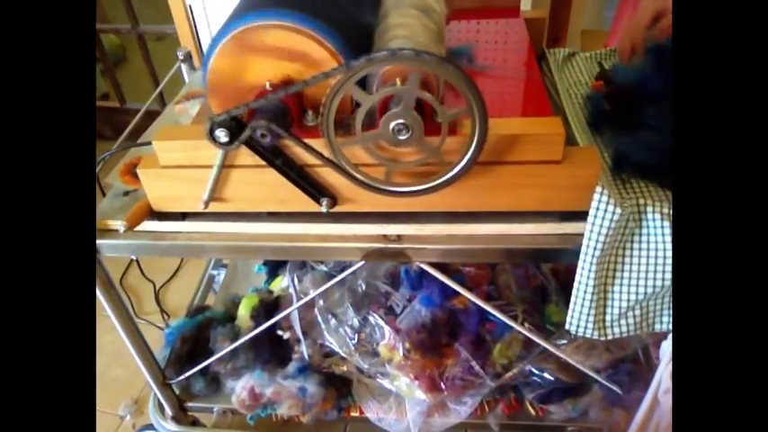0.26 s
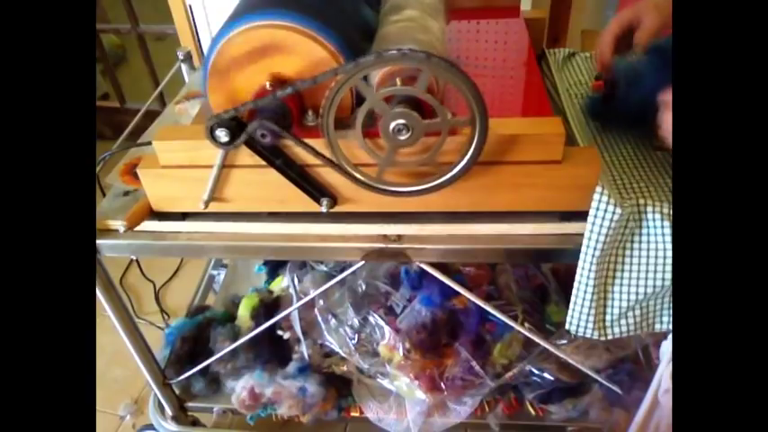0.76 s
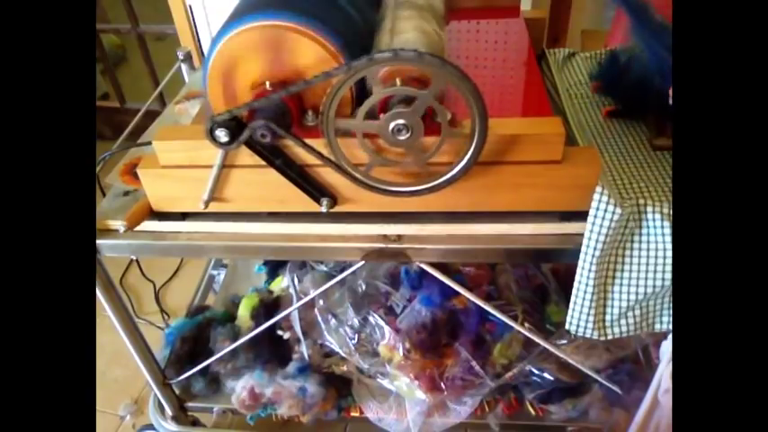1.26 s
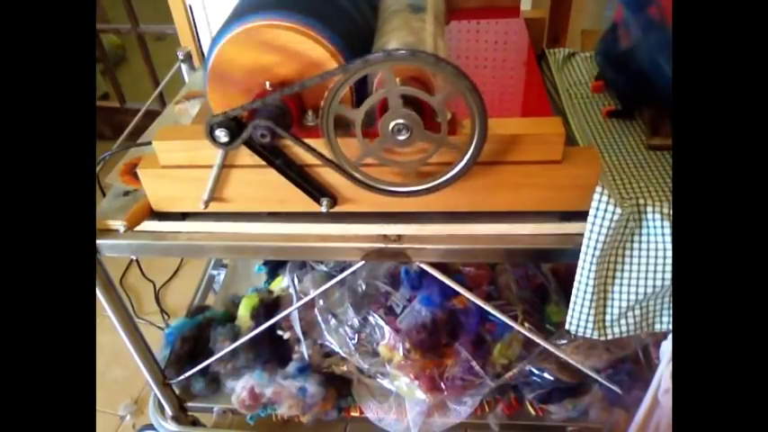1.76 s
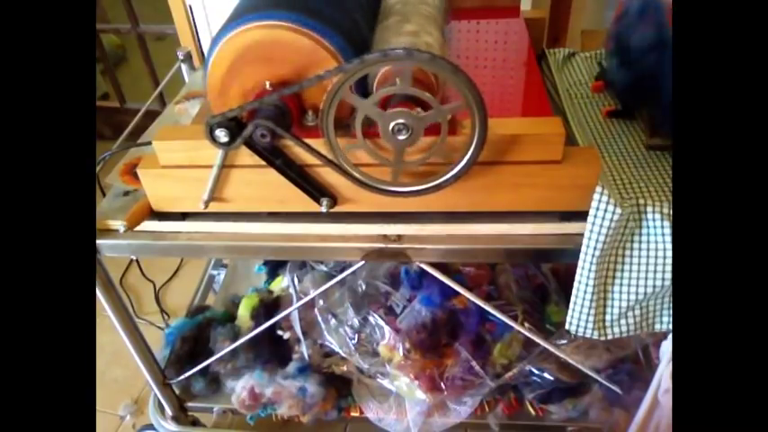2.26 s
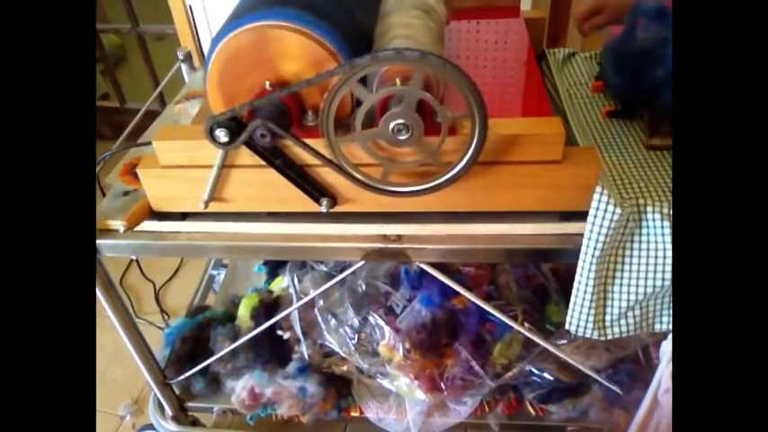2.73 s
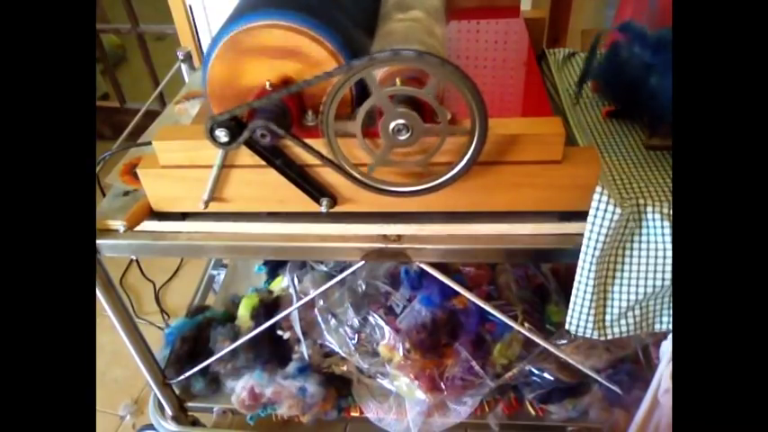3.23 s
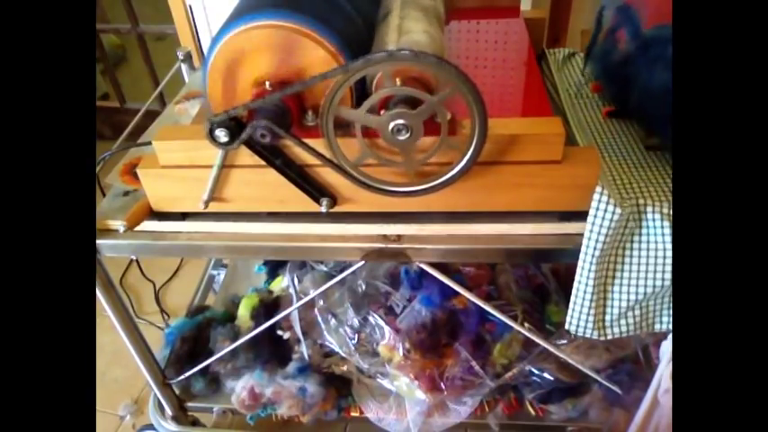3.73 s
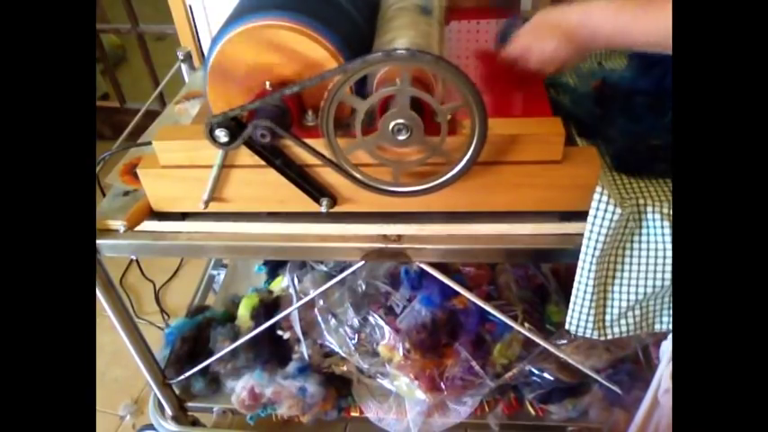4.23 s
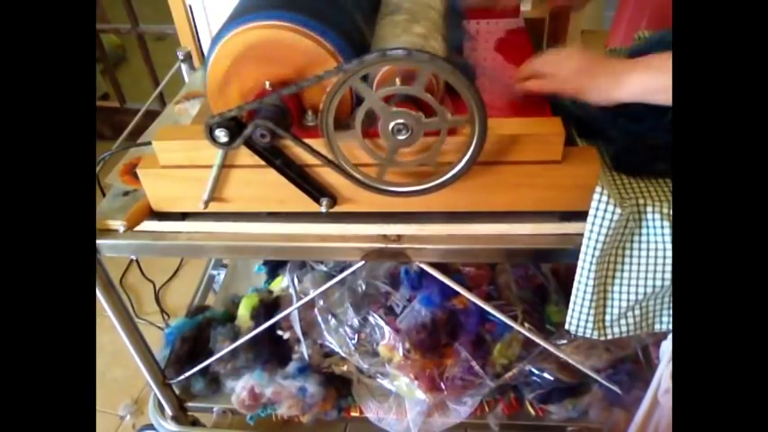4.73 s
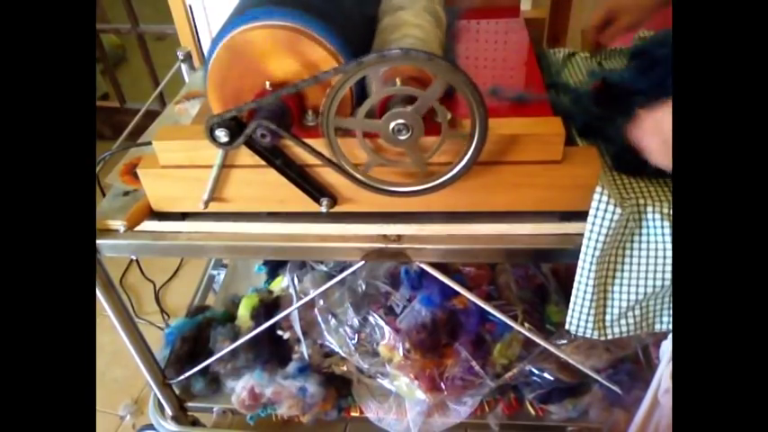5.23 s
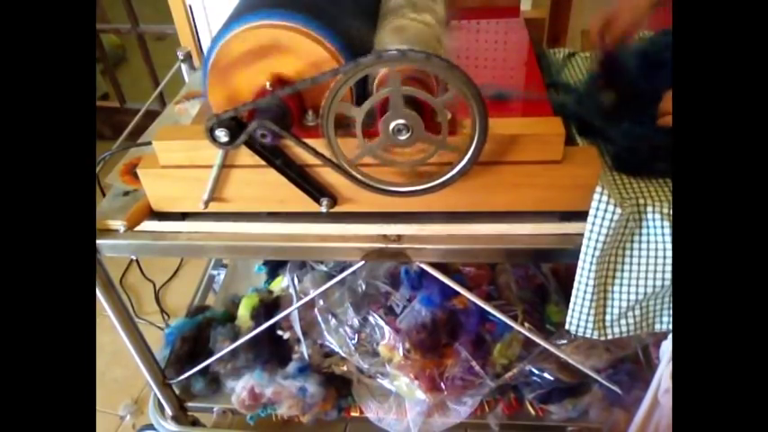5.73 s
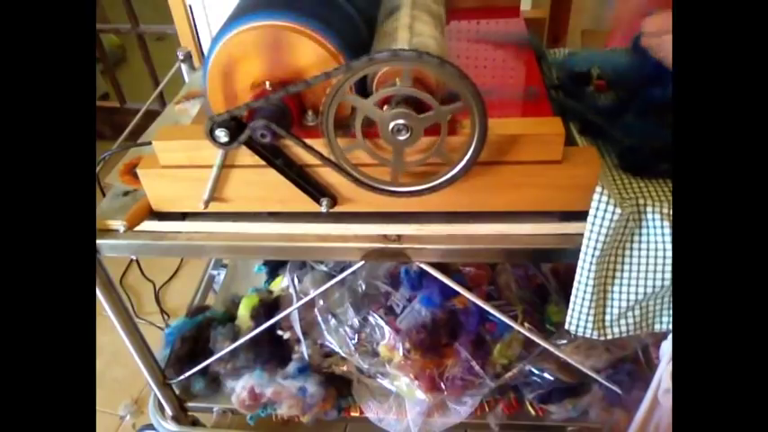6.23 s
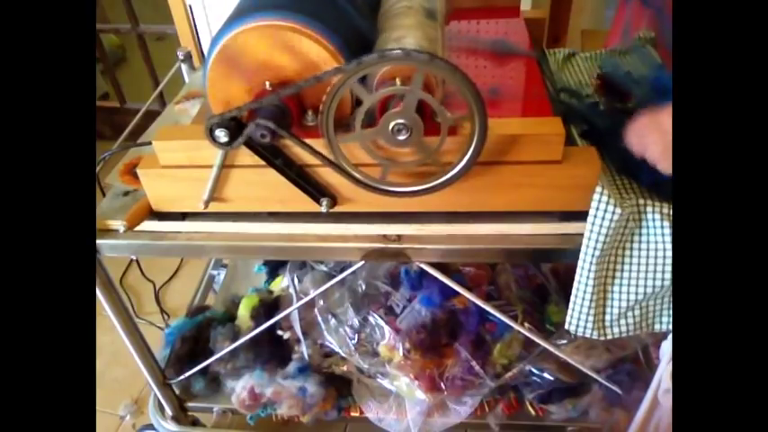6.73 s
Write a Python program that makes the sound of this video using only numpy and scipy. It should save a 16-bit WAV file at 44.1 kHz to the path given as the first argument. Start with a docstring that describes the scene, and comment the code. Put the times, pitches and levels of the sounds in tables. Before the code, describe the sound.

Close up, a motorized wool carder runs with quick chain clicking and knocking, a low hum, and rasping, snapping fibres.

```python
"""An electric drum carder on a table in a small room, one microphone close by.
From the start its induction motor hums, the wooden frame shakes and wool scrapes into the wire teeth;
a thick tuft snaps through with a clunk. After a second the drum runs freer: the chain clicks and knocks
over the sprockets, two high teeth tick on each turn and small knots snap. Near 5.7 s a hand pulls a
lock apart; then the drum slows as more wool is drawn in, and tufts clunk through again."""
import sys
import numpy as np
from scipy import signal
from scipy.fft import rfft, irfft
from scipy.io import wavfile

SR = 44100
rng = np.random.default_rng(int(sys.argv[2]) if len(sys.argv) > 2 else 0)


def store_pcm(level_fs):
    """Save levels as 16-bit WAV."""
    pcm = np.round(np.clip(level_fs, -1, 1) * 32767).astype(np.int16)
    wavfile.write(sys.argv[1], SR, np.atleast_2d(pcm).T)


N = 307818
TIME = np.arange(N) / SR
TURN_LINKS, LAP_LINKS = 8, 10  # links to a drum turn, and from one firm knock to the next
SEAT_LINK = 0.68  # how far into its step a link seats

# chain speed, which sags while wool is drawn in: (time [s], speed [links/s])
CHAIN_SPEED = [(0, 17.188), (0.55, 17.229), (1.0, 19.044), (1.4, 18.995), (2.1, 19.421), (5.95, 19.399),
               (6.2, 17.994), (6.75, 18.249), (6.98, 18.227)]
# resonances of the wooden frame: (frequency [Hz], width [Hz], gain [dB])
FRAME_MODES = [(174.7, 3.2, -9), (200.6, 7, -0.5), (242.4, 9, 4), (262.4, 5.9, 5.5), (264, 5.6, 1.5),
               (315.5, 20, -10), (352.7, 17, 7), (388.7, 8.7, 7.5), (399, 20, -2.5), (433, 14, -22)]
# spectra of rubbing wool, fine fibre hiss and a tuft's clunk: (frequency [Hz], level [dB])
RUB_SPECTRUM = [(80, -48), (300, -33), (700, 0), (950, 1.5), (1400, 3.5), (1850, 3.5), (2050, 1),
                (2350, -2.5), (2900, -11), (4200, -13), (6000, -19.5), (15000, -25)]
HISS_SPECTRUM = [(500, -50), (3000, 6), (5000, 4.5), (9000, 3), (12000, 0.5), (15500, -12)]
CLUNK_SPECTRUM = [(50, -53), (110, -18.5), (180, -2), (330, 0), (550, 7), (700, 5.5), (850, 3.5),
                  (1200, -9), (1850, -5.5), (2700, -17.5), (4500, -25.5), (8000, -42), (15000, -50)]


def amp(db):
    """Decibels to gain."""
    return 10 ** (np.asarray(db) / 20)


def unit(x):
    """Scales to an rms of 1."""
    return x / np.sqrt(np.mean(x ** 2) + 1e-20)


def curve(points):
    """Joins (time, value) points with straight lines, sample by sample."""
    return np.interp(TIME, *np.transpose(points))


def add(mix, s, sound):
    """Mixes a sound in at time s."""
    part = mix[max(round(s * SR), 0):][:len(sound)]
    part += sound[:len(part)]


def colour(x, spectrum, tilt_db=0):
    """Minimum-phase filter of unit energy; the spectrum tilts by tilt_db an octave about 1 kHz."""
    hz = np.fft.rfftfreq(4096, 1 / SR) + 1
    corner_hz, db = np.transpose(spectrum)
    octaves = np.log2(np.clip(hz, 200, 6000) / 1000)
    gain = amp(np.interp(np.log(hz), np.log(corner_hz), db) + tilt_db * octaves)
    cepstrum = irfft(np.log(gain + 1e-6))
    cepstrum[1:2048] *= 2  # folding the cepstrum makes the filter causal
    cepstrum[2049:] = 0
    taps = irfft(np.exp(rfft(cepstrum)))
    return signal.fftconvolve(x, taps / np.linalg.norm(taps))[:len(x)]


def drift(rate_hz):
    """Slow random motion of rms 1."""
    hz = np.fft.rfftfreq(N, 1 / SR)
    return unit(irfft(rfft(rng.standard_normal(N)) * np.exp(-(hz / rate_hz) ** 2), N))


def grains(per_s, spread_db):
    """Random tiny clicks, a few much larger than the rest."""
    size = amp(spread_db * np.minimum(rng.exponential(1, N), 4))
    return unit(size * rng.choice([-1, 1], N) * (rng.random(N) < per_s / SR))


def blow(t60, tail_db, tail_t60, tap):
    """A sharp tap, a short burst of contact noise and its weaker ring in the room."""
    t = TIME[:SR // 3]
    burst = rng.standard_normal(len(t)) * (amp(-60 * t / t60) + amp(tail_db - 60 * t / tail_t60))
    burst[0] += tap
    return burst


def resonate(x, modes):
    """Rings damped modes with x; the narrower a mode, the longer it lasts."""
    t = TIME[:SR // 2]
    response = sum(amp(db) * 2 * np.pi * width / SR * np.exp(-np.pi * width * t)
                   * np.cos(2 * np.pi * hz * t) for hz, width, db in modes)
    return signal.fftconvolve(x, response)[:N]


def link_phase(start_link=-0.976):
    """Running count of the chain links that have passed."""
    return start_link + np.cumsum(curve(CHAIN_SPEED)) / SR


def passes(first, every):
    """Times at which a given link comes round, again and again."""
    phase = link_phase()
    return np.interp(np.arange(first, phase[-1], every), phase, TIME)


def sag():
    """Fraction of its top speed that the chain loses to the load."""
    speed = curve(CHAIN_SPEED)
    return 1 - speed / speed.max()


def ducking(db_per_percent=0.4, limit_db=3):
    """Background ducking: hum, rumble, link clicks and rub dip a little in the slow, loud passages."""
    return amp(-np.minimum(db_per_percent * 100 * sag(), limit_db))


def motor(mains_hz=60.01, shaft_hz=28.86, sag_share=0.25, hum_waver=0.12, rotor_waver=0.49):
    """Magnetic hum at even multiples of the mains, with less steady tones from the loaded rotor."""
    # motor tones: (multiple of the mains, multiple of the shaft rate), and for each (level [dB])
    orders = [(2, 0), (4, 0), (6, 0), (8, 0), (10, 0), (12, 0), (2, 1), (2, 3), (4, 1), (6, 1), (0, 5),
              (0, 6), (0, 9), (0, 10), (0, 11)]
    levels = [-70.5, -49.5, -55.5, -80, -52.5, -73.5, -72, -62.5, -60, -59, -73, -65, -84, -62.5, -60]
    shaft_turns = shaft_hz * np.cumsum(1 - sag_share * sag() + 0.001638 * drift(4.5)) / SR
    out = np.zeros(N)
    for (mains, shaft), db in zip(orders, levels):
        cycles = mains * mains_hz * TIME + shaft * shaft_turns + rng.random()
        waver = 1 + (rotor_waver if shaft else hum_waver) * drift(7.3)
        out += amp(db) * np.sqrt(2) * np.sin(2 * np.pi * cycles) * waver
    return out


def frame():
    """The gears shake the wooden frame at its resonances, over a low rumble."""
    # rumble of the machine: (frequency [Hz], level [dB])
    rumble_spectrum = [(20, -51), (70, -17), (100, -10.5), (150, -6), (190, -18), (230, 3), (310, 1),
                       (430, -6.5), (600, 14), (680, -1), (900, -16.5), (1500, -12), (4000, -20.5)]
    shaken = resonate(grains(4000, 1.0), FRAME_MODES)
    shaken = signal.sosfilt(signal.butter(4, 150, "high", fs=SR, output="sos"), shaken)
    return amp(-49) * unit(shaken) + amp(-56) * colour(grains(4000, 4.7), rumble_spectrum)


def body(contact, gain_db=-2):
    """Whatever touches the drums reaches the microphone directly and through the machine's modes."""
    # drum, sprocket and side boards: (frequency [Hz], width [Hz], gain over the direct sound [dB])
    modes = [(470, 310, -11.5), (959, 48, 0.5), (1064, 15.5, 3.5), (1190, 38, 1), (1376, 15, 1.5),
             (1530, 16, 0), (1520, 7, -4), (1797, 23, 1.5), (2275, 28, 4), (2508, 50, -2.5), (2727, 32, 1),
             (3477, 20, 3)]
    return amp(gain_db) * (contact + resonate(contact, modes))


def drums(surge_db=3, settle_links=0.19, scratch_db=0.9):
    """Fibres rub through the teeth, surging as each link jerks the drum on, under a scratchy hiss."""
    # rubbing of the drums, and the fine hiss above it: (time [s], level [dB])
    rub_levels = [(1.1, -48.5), (1.5, -47), (1.95, -52.5), (2.9, -53), (3.4, -52), (4.45, -52),
                  (5.4, -52.5), (5.9, -50.5), (6.98, -50)]
    hiss_levels = [(0.9, -63), (1.15, -55.5), (1.35, -61.5), (1.7, -58.5), (2.0, -66.5), (2.55, -65.5),
                   (2.95, -67), (3.35, -65), (3.62, -71), (3.8, -62), (4.2, -61.5), (4.45, -78),
                   (4.62, -61), (4.9, -67.5), (5.4, -68.5), (5.9, -62.5), (6.6, -59), (6.98, -67)]
    jerk = np.exp(-((link_phase() - SEAT_LINK) % 1) / settle_links)
    fibres = (grains(2500, 2.0) + amp(-3) * grains(170, 2.3)) * amp(1.4 * drift(62))
    rub = amp(curve(rub_levels) - 2.5 + surge_db * jerk) * colour(fibres, RUB_SPECTRUM)
    hiss = amp(curve(hiss_levels) + scratch_db * drift(30)) * colour(grains(15000, 1.5), HISS_SPECTRUM)
    return rub + hiss


def catches(uneven_db=2):
    """Thick patches of wool catch between the drums and rasp for a moment on every turn."""
    # wool on the drum: (place in the turn [links], level [dB], length [links])
    patches = [(2.1, -52, 0.65), (6.2, -54.5, 0.9), (7.15, -49, 0.88)]
    phase, level = link_phase(), np.zeros(N)
    for link, db, length in patches:
        links_away = (phase - link + TURN_LINKS / 2) % TURN_LINKS - TURN_LINKS / 2
        level += amp(db) * np.exp(-(2 * links_away / length) ** 2)
    return level * amp(uneven_db * drift(9.2)) * colour(grains(2500, 1.1), RUB_SPECTRUM)


def rustle():
    """A lock is pulled apart by hand and ends with a small snap."""
    # parting fibres: (frequency [Hz], level [dB])
    spectrum = [(200, -44), (2800, -37), (4200, 14.5), (5200, 11), (5900, 4), (7200, 9.5), (8500, -14),
                (14000, -28)]
    level_db = curve([(5.68, -81), (5.735, -49), (5.774, -54), (5.777, -46), (5.783, -55), (5.81, -75)])
    return amp(level_db) * colour(grains(5500, 4.8), spectrum)


def links(spread_db=3, jingle_hz=3520, jingle_db=-24, jingle_t60=0.09):
    """Each link clicks as it seats and its roller jingles; a few seat hard, with a dry snap."""
    # click of a link: (frequency [Hz], level [dB])
    spectrum = [(200, -20), (500, -32), (1000, 11.5), (1900, 8.5), (2800, 1.5), (3500, 6.5), (4300, -4),
                (6000, -19), (14000, -24)]
    # click on each of the sprocket's eight teeth: (level [dB])
    tooth_db = [-48.5, -54.5, -52, -51.5, -55, -52, -46.5, -51]
    # links that seat hard: (time [s], level [dB], tilt [dB/octave])
    hard_links = [(1.103, -42, 1), (1.2106, -45, 5), (1.7368, -54, -2), (2.097, -55, -6), (2.1513, -49, -1),
                  (2.3553, -48.5, 1.5), (2.526, -42, -1), (2.714, -48, 4), (2.768, -55, 2),
                  (2.869, -47, -1.5), (3.1775, -42, -1.5), (3.2314, -54, 11), (3.6974, -46.5, 4.5),
                  (3.747, -46, 6), (4.624, -47, 3), (4.692, -51, -3), (4.778, -47, 4), (4.832, -46, -4.5),
                  (5.239, -44, 3), (5.342, -47.5, 4), (5.7004, -55, 2), (5.754, -46, 5), (6.290, -44, -1)]
    out, t = np.zeros(N), TIME[:SR // 3]
    for k, s in enumerate(passes(SEAT_LINK, 1)):
        db = tooth_db[k % TURN_LINKS] + spread_db * rng.standard_normal()
        add(out, s, amp(db) * colour(blow(0.04, -26, 0.1, tap=3.4), spectrum))
        roller_hz = jingle_hz * (1 + 0.048 * rng.standard_normal(size=3))
        jingle = sum(np.sin(2 * np.pi * hz * t) for hz in roller_hz)
        add(out, s, amp(db + jingle_db - 60 * t / jingle_t60) * jingle)
    for s, db, tilt_db in hard_links:
        add(out, s, amp(db) * colour(blow(0.051, -21, 0.13, tap=7), spectrum, tilt_db))
    return out


def knock(db, tilt_db, bounce_s=0.0098, bounce_db=-9):
    """A slack link clacks against the sprocket and bounces once."""
    # the clack: (frequency [Hz], level [dB])
    spectrum = [(120, -31), (300, 0.5), (520, 6.5), (720, -0.5), (960, -1), (1250, -1.5), (1800, -6),
                (2700, -16.5), (5000, -32), (14000, -45)]
    strike = blow(0.04, -10, 0.12, tap=7.5)
    add(strike, bounce_s * (0.5 + rng.random()), amp(bounce_db) * blow(0.025, -9, 0.066, tap=11))
    return amp(db - 9) * colour(strike, spectrum, tilt_db)


def hollow(db, lowest_hz=380, pitch_spread=0.013, spread_db=1):
    """The sprocket and its small board answer a knock with a hollow ring, never quite the same."""
    # their modes: (frequency [Hz], level [dB], t60 [s])
    modes = [(491, -19, 0.27), (534, -22, 0.32), (910, -17, 0.04), (969, -11, 0.078), (1060, -35, 0.027),
             (1790, -19, 0.06)]
    tock, t = np.zeros(SR // 3), TIME[:SR // 3]
    for hz, mode_db, t60 in modes:
        decay = amp(db + mode_db + spread_db * rng.standard_normal() - 60 * t / t60)
        tock += decay * np.sin(2 * np.pi * hz * (1 + pitch_spread * rng.standard_normal()) * t)
    return signal.sosfilt(signal.butter(3, lowest_hz, "high", fs=SR, output="sos"), tock)


def tocks():
    """Light knocks ring mainly the upper modes of the big sprocket: a short pitched tock."""
    # light knocks: (time [s], level [dB])
    strikes = [(1.997, -33), (2.940, -31), (3.13, -33), (3.178, -42), (3.593, -40), (3.642, -35.5),
               (4.005, -43), (4.418, -36), (4.508, -33), (4.778, -35), (5.186, -34), (5.648, -36)]
    out = np.zeros(N)
    for s, db in strikes:
        add(out, s, knock(db - 5, tilt_db=-1) + hollow(db, lowest_hz=800))
    return out


def chain(spread_db=2):
    """The chain knocks firmly each lap and clacks brightly each drum turn, among rattles and slaps."""
    # knock of each lap, and clack of each turn: (level [dB])
    lap_db = [-31.5, -37, -30.5, -30.5, -30.5, -33.5, -33.5, -30, -30.5, -31.5, -32, -29, -30, -34]
    turn_db = [-50.5, -40, -46, -36, -40, -37, -39, -30, -36, -40, -36, -31, -47, -33.5, -44, -48]
    # lighter recurring knocks: (period [links], first [link], level [dB], tilt [dB/octave])
    rattles = [(LAP_LINKS, 6.2, -46, -0.92), (LAP_LINKS, 8.4, -40, -4.3), (LAP_LINKS, 4.9, -37.5, -2),
               (TURN_LINKS, 2.66, -43, 3.1)]
    # stray slaps of a slack link: (time [s], level [dB], tilt [dB/octave])
    slaps = [(1.632, -47, 3), (1.854, -36.5, 3.5), (2.407, -40, 4), (2.508, -37, 3), (2.920, -30.5, 0.5),
             (2.994, -42, 12), (3.149, -46, 4), (3.2839, -35, 0), (3.903, -37, 6), (4.110, -35.5, 5),
             (5.3948, -28.5, -2)]
    out = np.zeros(N)
    for s, db in zip(passes(first=1.09, every=LAP_LINKS), lap_db):
        add(out, s, knock(db - 0.5, tilt_db=-2.5) + hollow(db))
    for s, db in zip(passes(first=6.03, every=TURN_LINKS), turn_db):
        add(out, s, knock(db, tilt_db=5.5))
    for every, first, db, tilt_db in rattles:
        for s in passes(first, every):
            add(out, s, knock(db + spread_db * rng.standard_normal(), tilt_db))
    for s, db, tilt_db in slaps:
        add(out, s, knock(db, tilt_db))
    return out


def wires(usual_db=-42, snap_follow=0.37):
    """Two high wire teeth, a link apart, flick past on each turn and ping, purer when hit harder."""
    # ticks, turn by turn: (first tooth [dB], second tooth [dB])
    ticks = [(-41, -46), (-48, -31.5), (-43.5, -66), (-37, -61), (-55, -57), (-43.5, -51), (-49, -45.5),
             (-47, -53), (-39, -49), (-46, -42.5), (-49, -47.5), (-41.5, -51), (-41, -65), (-42, -56),
             (-44, -47.5), (-40, -47.5), (-45.5, -59)]
    # a wire's ring and its broad snap: (frequency [Hz], level [dB])
    ping_spectrum = [(8000, -22.5), (11000, -11.5), (11900, -5), (12500, -2.5), (12900, -17), (13400, -33)]
    snap_spectrum = [(40, -23), (300, -17), (1500, 10.5), (3500, -3), (6000, 0), (10000, -1.5),
                     (12500, -10), (14000, -9), (16000, -34)]
    # reflections off the table and walls: (delay [s], level [dB])
    echoes = [(0.0024, -1.5), (0.0054, -8), (0.0085, -5), (0.01, -29), (0.023, -12)]
    direct = np.zeros(N)
    for link, levels in enumerate(np.transpose(ticks)):
        for s, db in zip(passes(link, TURN_LINKS), levels):
            ping = amp(db - 8.3) * colour(blow(0.012, -7.5, 0.18, tap=9), ping_spectrum)
            snap_db = -51.2 + snap_follow * (db - usual_db)
            snap = amp(snap_db) * colour(blow(0.024, -4.5, 0.21, tap=9), snap_spectrum)
            add(direct, s, ping + snap)
    out = direct.copy()
    for delay, db in echoes:
        add(out, delay, amp(db) * direct)
    return out


def snags(t60=0.083, first_pluck=12):
    """A knot gives way with one sharp pluck, and its last fibres follow in a quickly dying crackle."""
    # knots caught on a tooth: (time [s], level [dB], pitch [Hz])
    knots = [(0.457, -28, 1500), (1.283, -32.5, 1480), (1.7024, -35, 1710), (2.115, -37, 1400),
             (2.529, -35.5, 1720), (2.938, -39, 1400), (3.338, -36, 1900), (3.5605, -34.5, 1700),
             (3.9827, -35.5, 1980), (4.213, -35, 1800), (4.8508, -32, 1210), (5.0562, -32, 1800),
             (5.8291, -34, 1590)]
    # spectrum of a snap: (multiple of its pitch, level [dB])
    snap_shape = [(0.15, -33), (0.55, -11.5), (0.85, 3.5), (1.15, -3), (1.6, -13.5), (3.2, -21.5), (8, -44)]
    out, t, plucks = np.zeros(N), TIME[:SR // 8], grains(2200, 1.8)
    for s, db, hz in knots:
        tear = np.roll(plucks, rng.integers(N))[:len(t)] * amp(-60 * t / t60)
        tear[0] += first_pluck
        snap = colour(tear, [(hz * multiple, level) for multiple, level in snap_shape])
        add(out, s, amp(db) * snap / abs(snap).max())
    return out


def pull(t, rise, hold, release):
    """Envelope of a pull on the wool: it rises, holds, then falls 20 dB in each release time."""
    return np.clip(t / rise, 0, 1) * amp(-20 * np.maximum(t - rise - hold, 0) / release)


def wool(rasp_width_hz=170, rasp_db=-1, uneven_db=1.5):
    """The teeth tear fresh locks open: dense plucks merge into a pitched scrape with fizz on top."""
    # locks drawn in: (start [s], rise [s], hold [s], release [s], scrape [dB], fizz [dB], rasp [Hz])
    locks = [(-.02, 0.024, 0.095, 0.23, -45.5, -58.5, 1250), (0.075, 0.1, .02, 0.32, -42.5, -51.5, 1300),
             (0.382, 0.022, 0.041, 0.22, -40, -54.5, 1200), (0.418, 0.043, 0.032, 0.25, -37, -48.5, 1180),
             (0.544, 0.003, 0.01, 0.22, -37, -43.5, 1610), (0.747, 0.03, 0.026, 0.11, -38.5, -50, 1550),
             (0.805, 0.034, 0.032, 0.21, -46, -55, 1710), (0.953, 0.006, 0.042, 0.16, -41.5, -56, 1490),
             (3.349, 0.005, 0.12, 0.11, -49.5, -65, 1520), (3.968, 0.009, 0.027, 0.12, -53, -77, 2020),
             (5.98, 0.064, 0.021, 0.32, -41.5, -57, 1440), (6.117, 0.06, 0.025, 0.11, -38, -50.5, 1470),
             (6.265, 0.056, 0.094, 0.2, -45, -60, 1720), (6.40, 0.056, 0.064, 0.29, -43, -54.5, 1250),
             (6.53, 0.026, 0.023, 0.23, -45, -58, 1550), (6.682, 0.0029, 0.004, 0.04, -31.5, -66, 1800),
             (6.698, 0.0082, 0.085, 0.23, -43.5, -57, 1710), (6.848, 0.006, 0.01, 0.064, -52, -66, 1840),
             (6.9, 0.0052, 0.0084, 0.068, -49, -68, 2080)]
    # teeth scraping through a lock: (frequency [Hz], level [dB])
    spectrum = [(80, -68), (250, -33), (420, -1.5), (720, -4), (1000, -5.5), (1300, 0), (1800, -0.5),
                (2300, -6.5), (3000, -16), (4200, -15.5), (6000, -31), (9000, -31), (15000, -32)]
    scrape = colour(grains(3500, 2.2), spectrum) * amp(uneven_db * drift(34))
    fizz = colour(grains(9000, 1.7), HISS_SPECTRUM)
    out, fizz_power = np.zeros((2, N))
    for s, rise, hold, release, scrape_db, fizz_db, rasp_hz in locks:
        swell = pull(TIME - s, rise, hold, release)
        plucks = np.roll(scrape, rng.integers(N))
        rasp = signal.lfilter(*signal.iirpeak(rasp_hz, rasp_hz / rasp_width_hz, fs=SR), plucks)
        out += amp(scrape_db) * swell * unit(plucks + amp(rasp_db) * rasp)
        fizz_power += (amp(fizz_db) * swell) ** 2
    return out + fizz * np.sqrt(fizz_power)


def judder(rise_s=0.0028, frame_db=-2):
    """A dragging tuft slips in dense little jerks that keep the frame growling until it is through."""
    # drags on the feed drum: (start [s], fades after [s], release [s], level [dB], tilt [dB/octave])
    drags = [(0.551, 0.01, 0.11, -39, -1.5), (6.132, 0.03, 0.08, -40.5, -1), (6.165, 0.031, 0.051, -51, 6),
             (6.686, 0.064, 0.057, -39.5, 1.5)]
    jerks, t, slips = np.zeros(N), TIME[:SR // 2], grains(1300, 2.1)
    for s, length, release, db, tilt_db in drags:
        slipping = colour(np.roll(slips, rng.integers(N))[:len(t)], CLUNK_SPECTRUM, tilt_db)
        add(jerks, s, amp(db) * pull(t, rise_s, length - rise_s, release) * slipping)
    return jerks + amp(frame_db) * resonate(jerks, FRAME_MODES)


def tufts(rise_s=0.004, reach_octaves=0.22):
    """A thick tuft pulls free and the feed drum jolts the frame, ringing modes near the jolt's pitch."""
    # clunks: (time [s], level [dB], tilt [dB/octave], tail scale [s], jolt pitch [Hz], jolt [dB])
    clunks = [(0.550, -20, 1, 0.039, 362, -22.5), (0.555, -17, 1, 0.075, 325, -24.5),
              (0.573, -26, -8, 0.27, 330, -29), (0.588, -35, -5, 0.088, 257, -29.5),
              (0.607, -23.5, 6.5, 0.081, 330, -30), (4.01, -31, -8.5, 0.21, 226, -52),
              (6.131, -22.5, -1, 0.11, 600, -33), (6.143, -27, 7, 0.11, 400, -37.5),
              (6.185, -28, 4.5, 0.16, 200, -43), (6.685, -22, -2, 0.035, 1800, -13.5),
              (6.690, -32, -5.5, 0.061, 214, -35), (6.704, -29, -2.5, 0.16, 590, -33),
              (6.729, -29.5, -2.5, 0.39, 433, -27)]
    # modes of the jolted frame: (frequency [Hz], level [dB], t60 [s])
    modes = [(211, -2, 1), (239, -2, 0.26), (263, -1.5, 0.19), (310, -5, 0.26), (357.4, 1, 0.15),
             (395, 4, 0.13), (592, 5, 0.11), (1736, 7, 0.014)]
    out, t = np.zeros(N), TIME[:SR // 3]
    onset = 1 - np.exp(-t / rise_s)
    for s, db, tilt_db, tail_s, jolt_hz, jolt_db in clunks:
        impact = blow(0.015, -0.65, 2.43 * tail_s, tap=2.5)
        add(out, s, amp(db - 12) * colour(impact, CLUNK_SPECTRUM, tilt_db))
        for hz, mode_db, t60 in modes:
            share = np.exp(-(np.log2(hz / jolt_hz) / reach_octaves) ** 2)
            decay = amp(jolt_db + mode_db - 60 * t / t60)
            add(out, s, share * onset * decay * np.sin(2 * np.pi * hz * t))
    return out


def scene():
    """The whole carder from close by, in mono."""
    dip = ducking()
    contact = dip * (links() + drums()) + chain() + tocks()
    contact += wool() + snags() + catches() + tufts() + judder()
    background = dip * (motor() + frame())
    return (background + body(contact) + wires() + rustle())[None]


def record(dry):
    """The recorder cuts off the treble above 15.6 kHz."""
    lowpass = signal.firwin(401, 15600, window=("kaiser", 8), fs=SR)
    return signal.oaconvolve(dry, lowpass[None], "same")


dry = scene()
out = record(dry)
store_pcm(out)
```